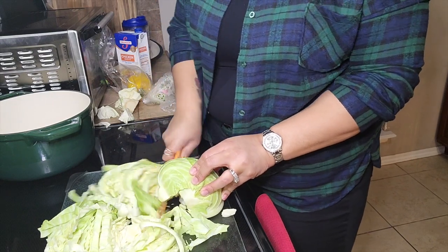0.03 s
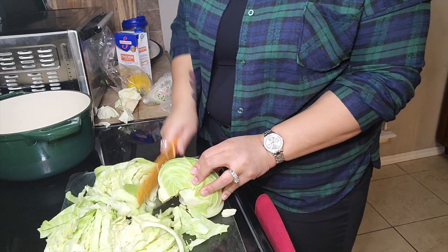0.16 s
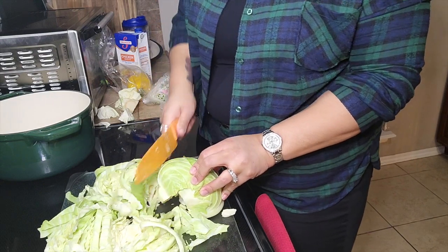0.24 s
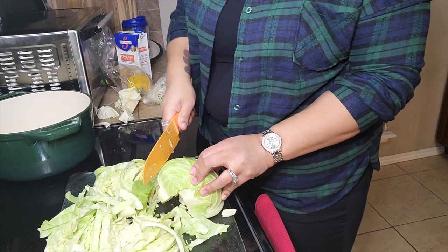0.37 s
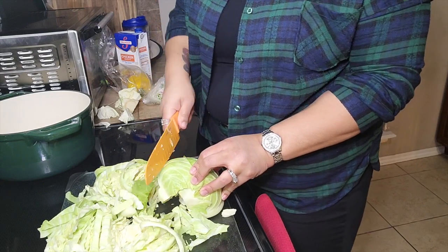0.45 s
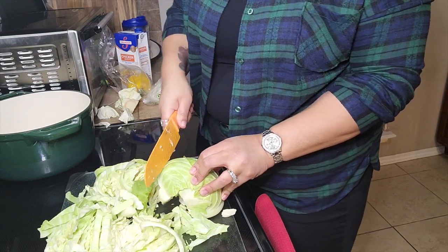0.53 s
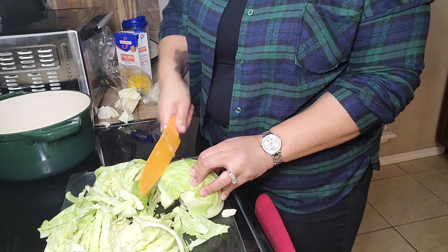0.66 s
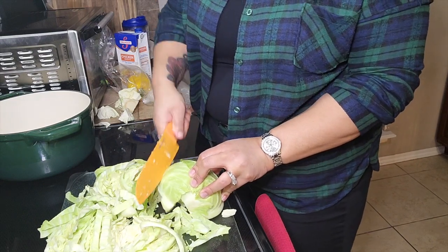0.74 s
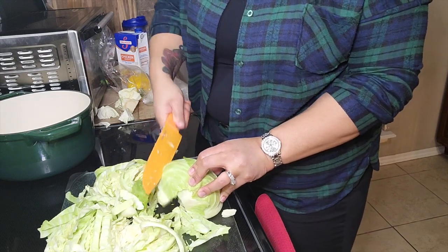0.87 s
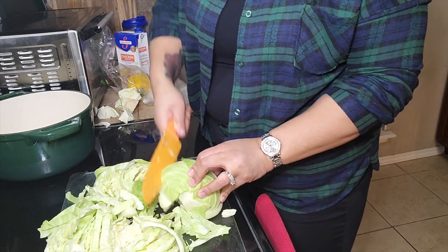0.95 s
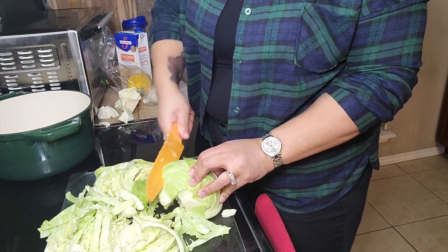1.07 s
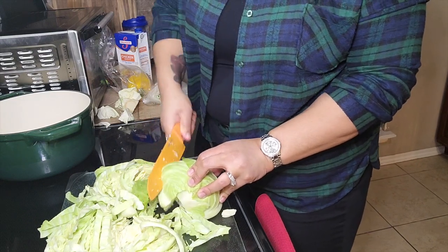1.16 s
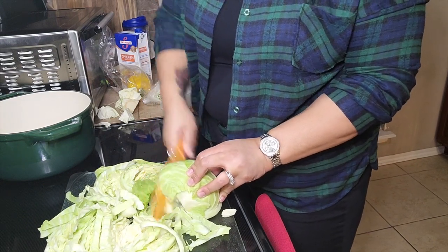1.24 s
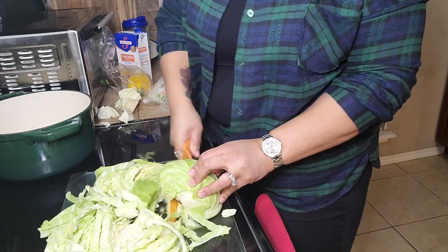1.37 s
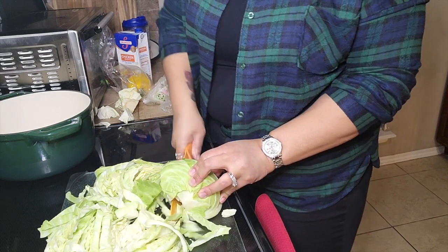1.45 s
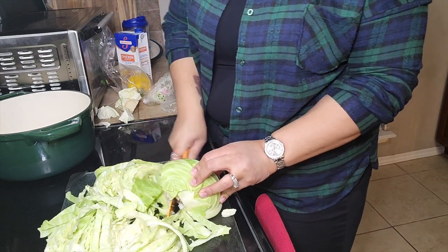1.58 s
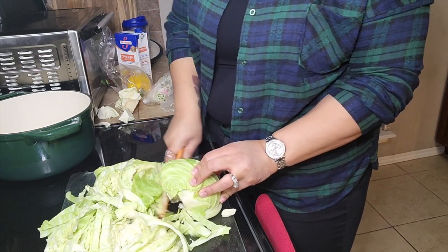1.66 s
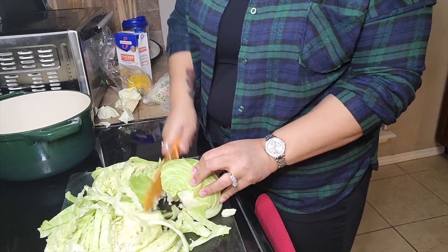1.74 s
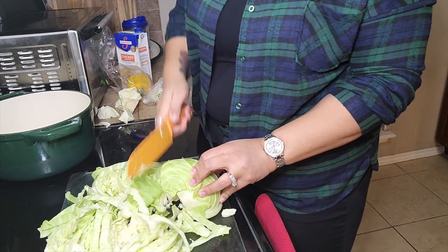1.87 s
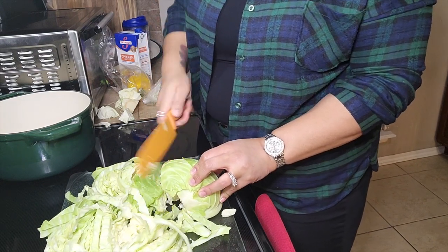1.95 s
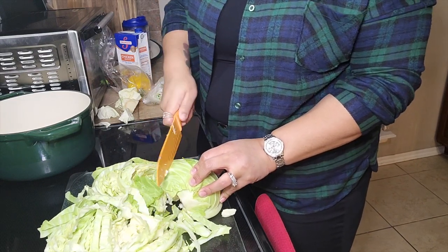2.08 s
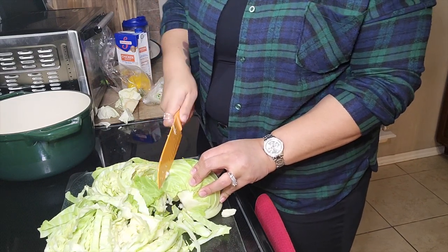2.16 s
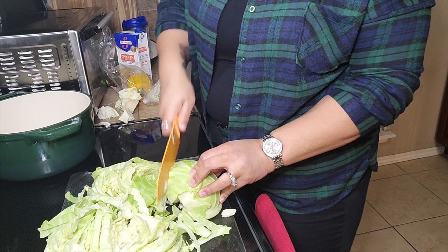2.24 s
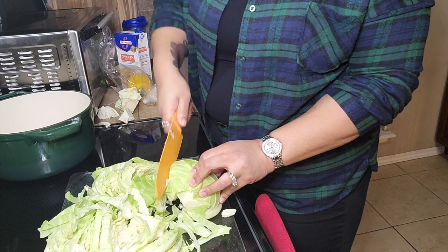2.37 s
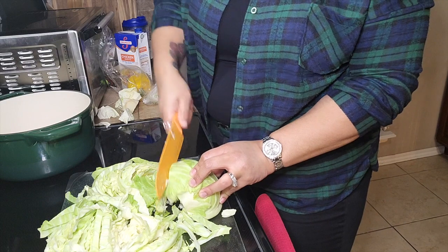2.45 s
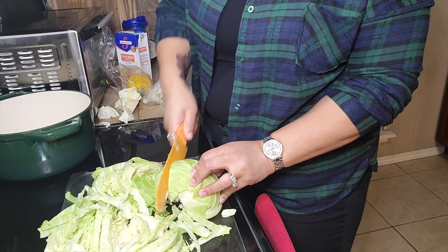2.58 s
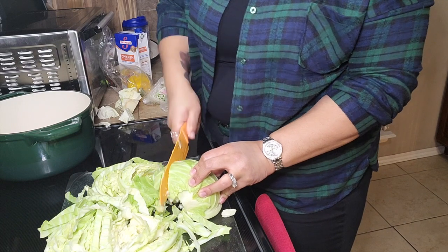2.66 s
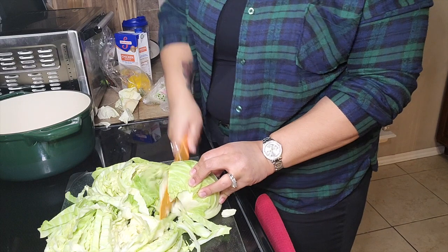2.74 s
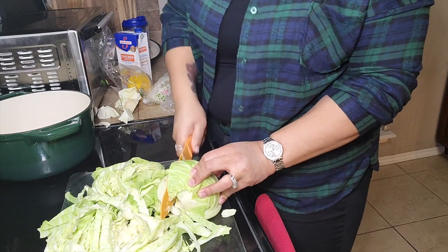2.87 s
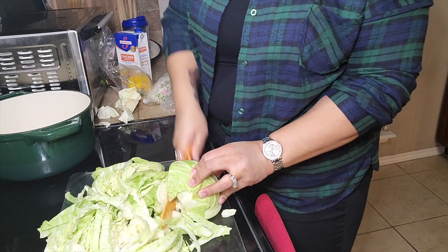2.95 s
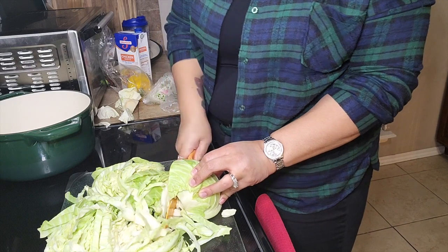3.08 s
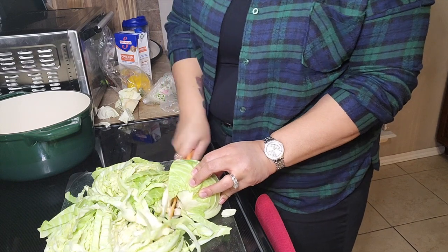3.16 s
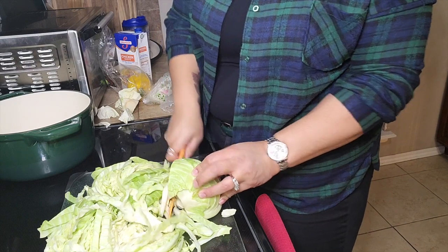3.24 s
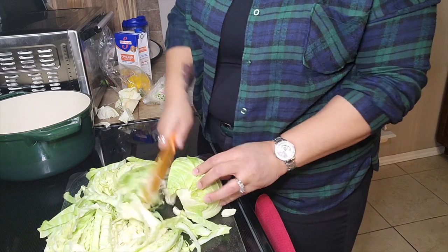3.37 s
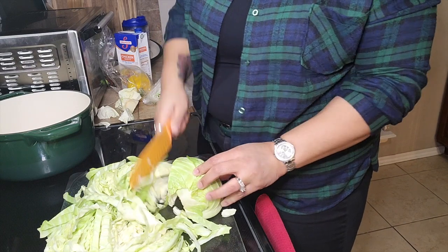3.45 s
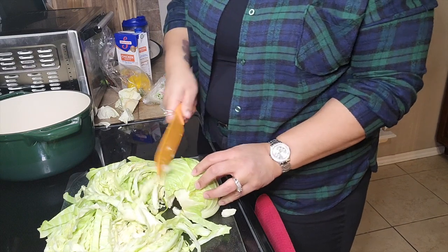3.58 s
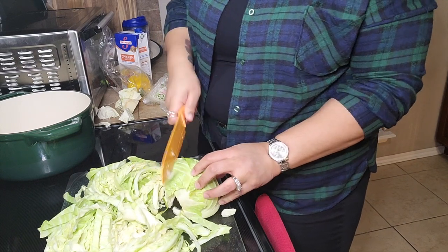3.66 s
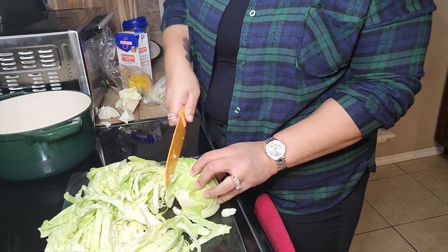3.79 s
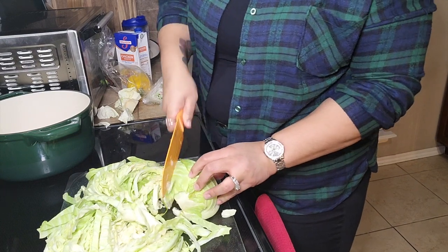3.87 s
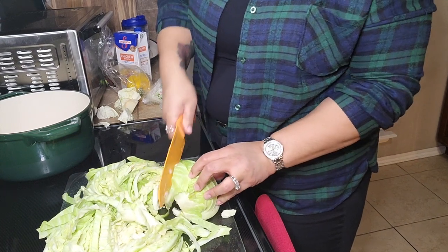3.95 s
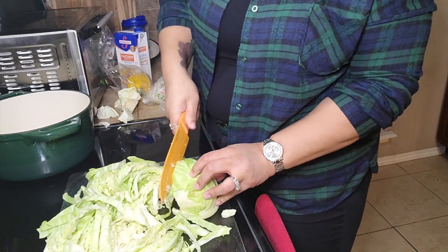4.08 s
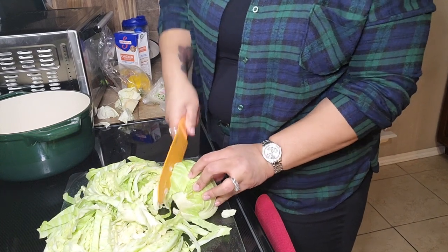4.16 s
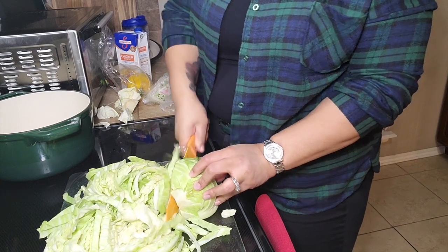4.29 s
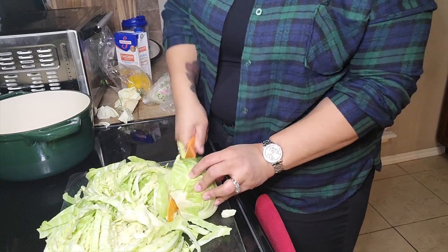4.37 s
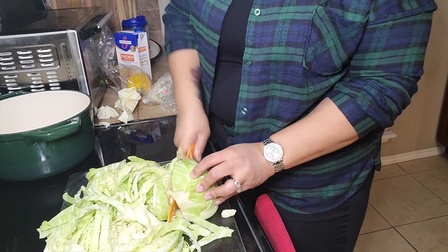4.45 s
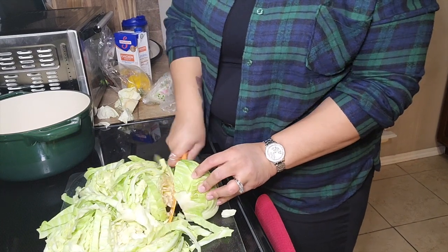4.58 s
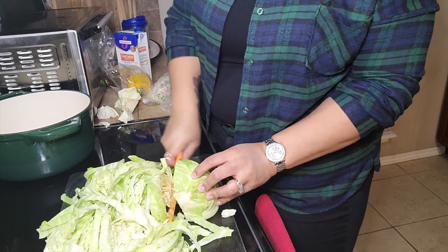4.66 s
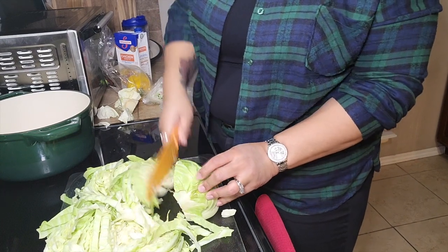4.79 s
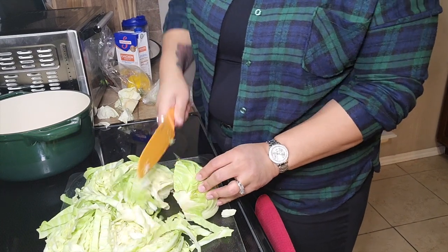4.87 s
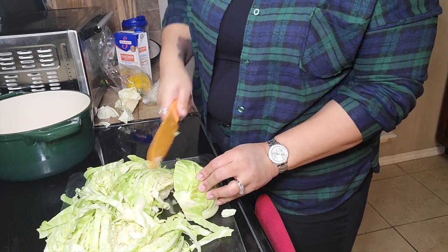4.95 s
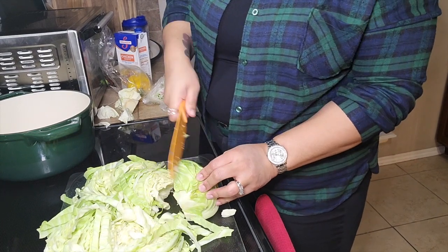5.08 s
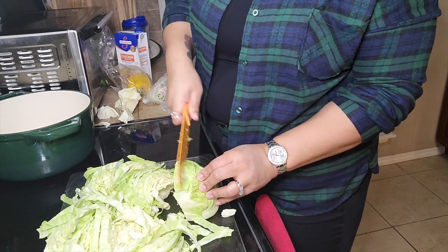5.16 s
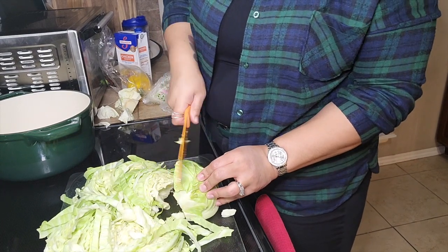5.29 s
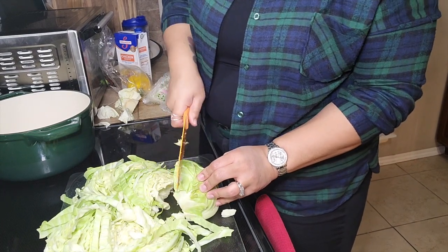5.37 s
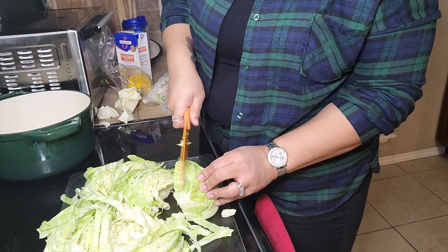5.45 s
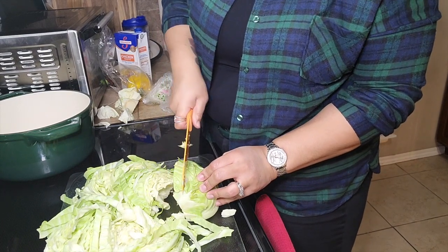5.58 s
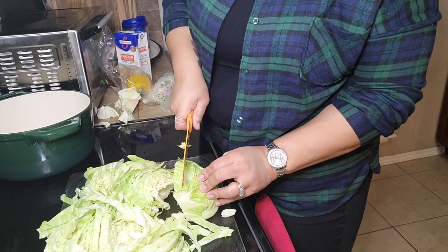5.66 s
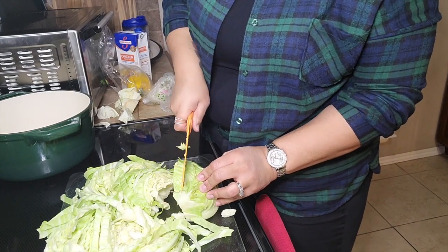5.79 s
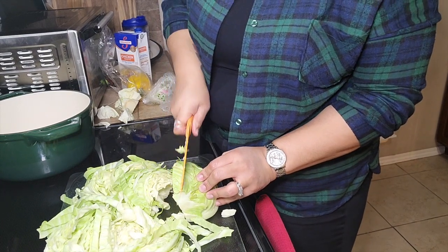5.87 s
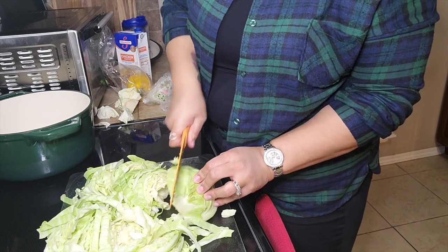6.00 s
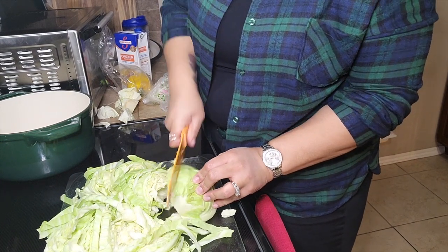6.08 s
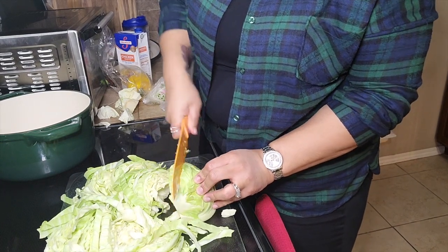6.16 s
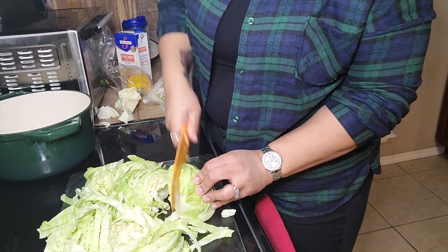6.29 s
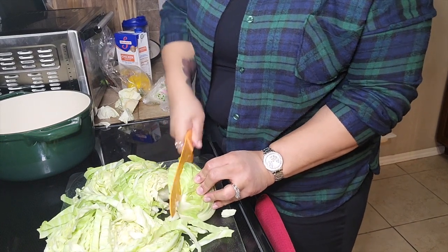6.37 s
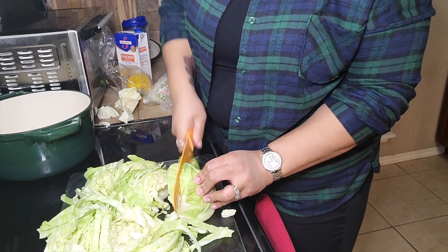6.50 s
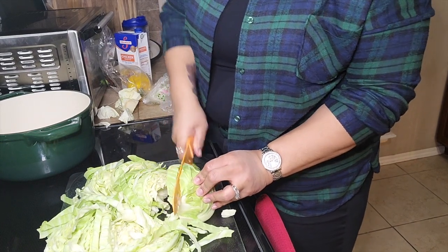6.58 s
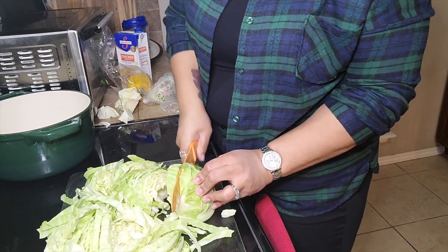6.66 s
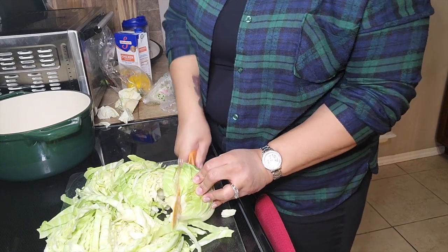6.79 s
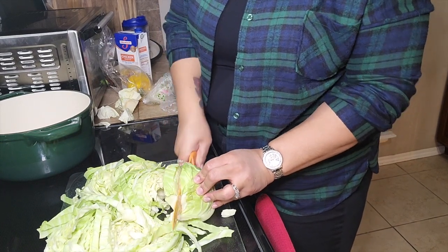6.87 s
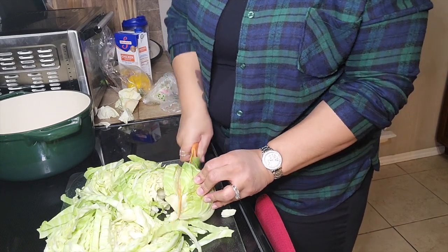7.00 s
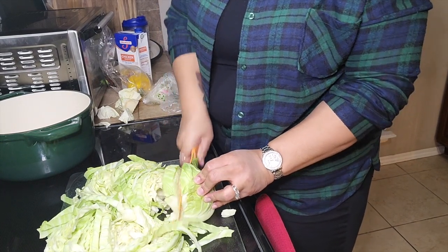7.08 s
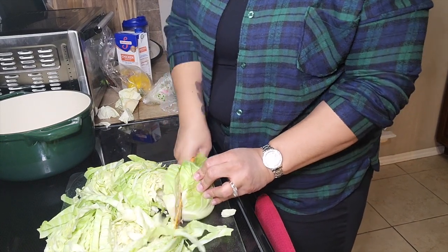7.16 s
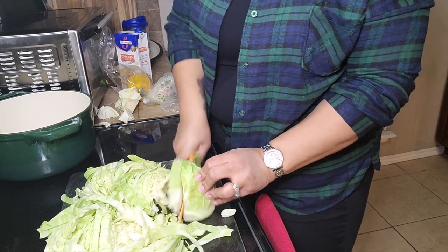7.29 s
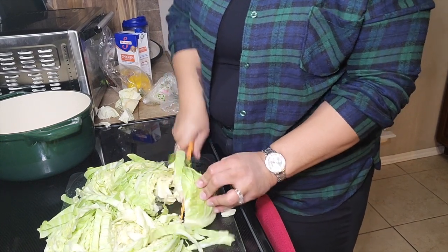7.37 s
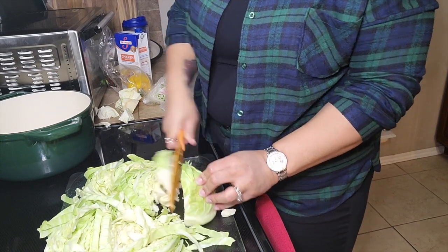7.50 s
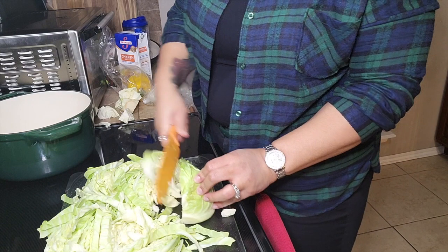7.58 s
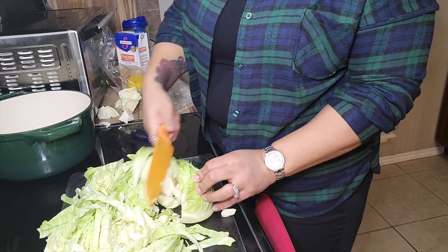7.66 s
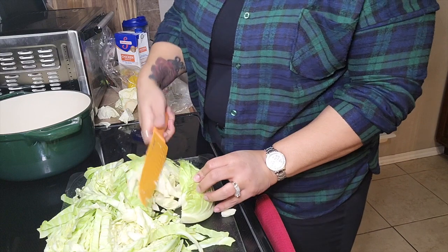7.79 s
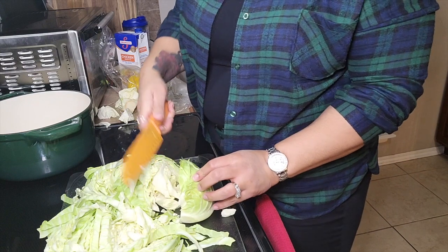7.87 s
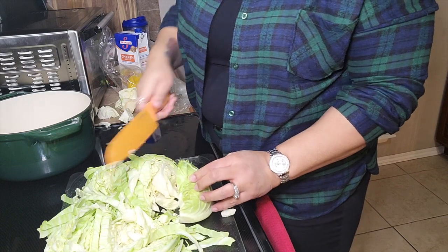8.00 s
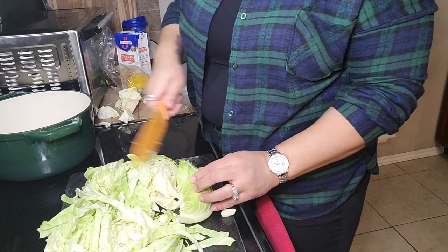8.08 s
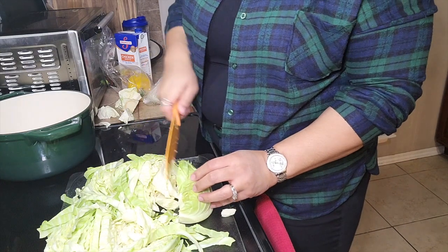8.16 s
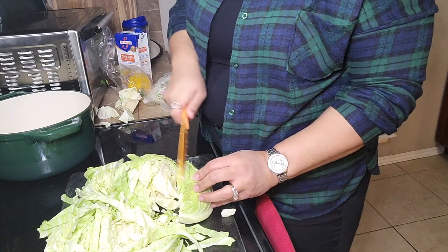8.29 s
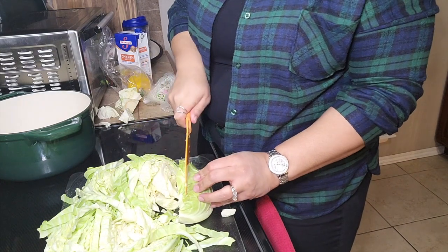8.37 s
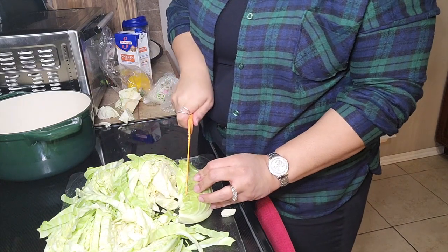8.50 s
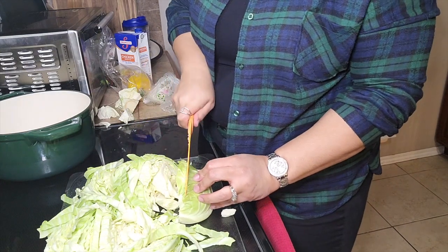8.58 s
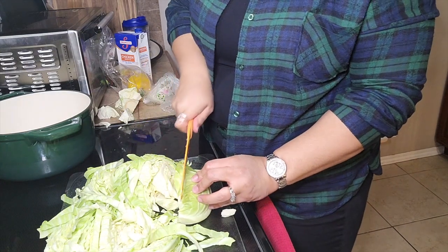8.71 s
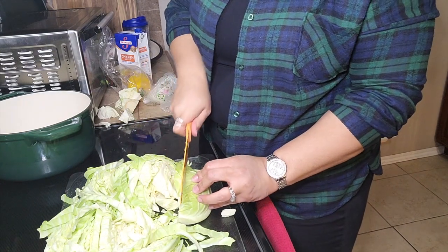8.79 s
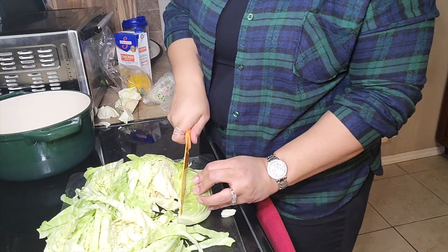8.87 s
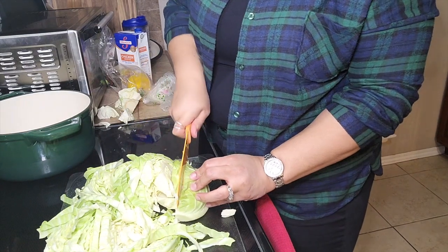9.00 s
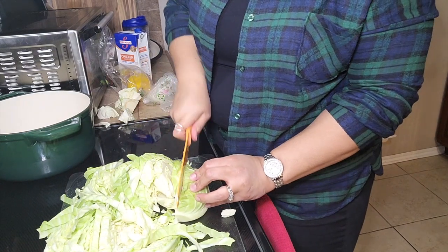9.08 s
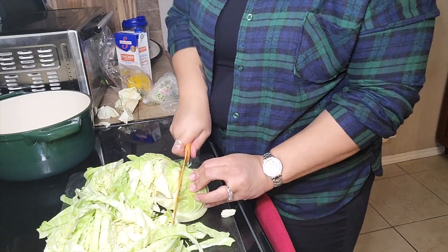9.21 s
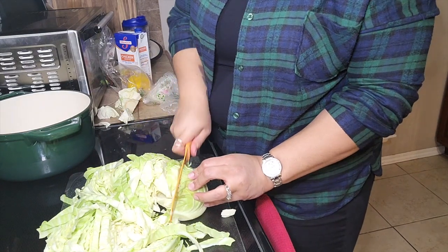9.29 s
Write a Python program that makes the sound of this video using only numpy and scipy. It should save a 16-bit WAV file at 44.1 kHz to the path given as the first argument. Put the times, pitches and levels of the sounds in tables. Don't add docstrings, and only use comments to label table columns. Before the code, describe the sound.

Close stereo camera microphone in a modestly reverberant kitchen. Irregular groups of two to five knife strokes crunch through cabbage, each with gritty leaf tearing, knocking stalks and a soft boomy shudder of the counter. The hardest cracks briefly push down the background hum, which swells back. A quieter stretch past the middle leaves only small leaf ticks and one light cut before heavier chopping resumes and ends with more crunches.

```python
import sys
import numpy as np
from scipy import signal
from scipy.fft import rfft, irfft, next_fast_len
from scipy.io import wavfile
from scipy.ndimage import map_coordinates

SR = 44100
rng = np.random.default_rng(int(sys.argv[2]) if len(sys.argv) > 2 else 0)


def master_out(mix):
    frames = np.transpose(np.atleast_2d(mix))
    ceiling = np.clip(frames, -1, 1)
    pcm = np.round(ceiling * 32767).astype(np.int16)
    wavfile.write(sys.argv[1], SR, pcm)


def decibels_to_gain(level_db):
    exponent = np.asarray(level_db, float) / 20
    return 10 ** exponent


N = 411894

# (frequency [Hz], level [dB rms])
MOTOR_LINES = [(48.3, -48.5), (59.2, -42)]
# (frequency [Hz], level [dB rms])
FRIDGE_OVERTONES = [(118.4, -62), (193.8, -57), (296.1, -62.5), (382.2, -66), (581.4, -70.5)]
# (frequency [Hz], density [dB per Hz])
AIR_SPECTRUM = [(15, -33), (25, -5), (64, -9.5), (153, -20), (200, -16.5), (394, -17), (1100, -33.5),
                (1370, -33), (2410, -47), (11900, -60.5), (16000, -63.5)]
# (frequency [Hz], correlation [1])
AIR_LIKENESS = [(60, 0.87), (240, 0.78), (950, 0.12), (3770, 0.06), (15000, 0.01)]
# (time [s], depth [dB])
GAIN_DUCKS = [
    (0, 10),
    (1.56, 15),
    (3.15, 11.5),
    (7.28, 11),
]
# (frequency [Hz], t60 [s])
ROOM_DECAY = [(200, 1), (1000, 0.98), (4000, 0.76), (12000, 0.94)]
# (frequency [Hz], left lead [rad])
PORT_LEAD = [(0, 0), (1120, -0.1), (1380, -0.8), (1890, 0.4), (2500, -1.0), (2930, 1.2), (3190, -1.8),
             (3450, 0.3), (5000, -0.2), (5250, -0.2), (11000, -0.3), (14900, -10.3), (15800, -6.1),
             (16400, -8.9)]
# (frequency [Hz], left minus right [dB])
PORT_TILT = [(60, -2.5), (150, 1.5), (380, -7.5), (950, -1.5), (2380, 2), (5980, 8), (15000, -6)]
# (frequency [Hz], width [Hz], level [dB])
COUNTER_MODES = [(52.4, 27, -3.5), (83, 24, 1), (145, 32, -5.5), (269, 31, -17)]
# (time [s], peak level [dB], pitch [Hz])
ARM_LEANS = [(0.696, -26.5, 63), (0.818, -32, 46), (0.957, -23.5, 106.4), (1.199, -20.5, 76.6),
             (1.447, -30, 57), (2.259, -24, 85.3), (2.49, -21.5, 71), (2.728, -14.5, 59.7),
             (2.958, -20.5, 53.6), (3.085, -30, 64), (3.16, -33, 54.1), (3.908, -22, 131),
             (4.176, -17.5, 75.4), (4.426, -22.5, 65.4), (5.18, -25, 53.2), (5.45, -37, 53.6),
             (5.974, -20.5, 51.4), (6.127, -31, 133), (6.267, -13, 74.5), (6.547, -19.5, 60.4),
             (6.656, -17.5, 60.4), (7.097, -23, 67), (8.703, -22, 77), (8.829, -21, 80.8), (9.119, -26, 60)]
# (time [s], peak level [dB], pitch [Hz])
EDGE_LANDINGS = [(0.709, -29.5, 61.4), (.99, -26, 73), (1.009, -14.5, 50.6), (1.226, -17.5, 77),
                 (2.26, -16, 71), (2.5, -17.5, 69.4), (2.542, -20, 93), (2.743, -21, 83),
                 (2.976, -24.5, 71), (3.916, -15.5, 92), (3.977, -14.5, 54.3), (4.002, -23.5, 59.6),
                 (4.189, -21, 62.4), (4.233, -14.5, 69), (5.983, -24.5, 56.6), (6.274, -23.5, 74),
                 (6.336, -15, 67), (6.362, -25, 77), (6.767, -16.5, 55), (6.795, -16, 60),
                 (7.161, -16.5, 64.6), (8.845, -30, 59), (9.13, -13, 52), (9.163, -19.5, 55.4),
                 (9.23, -20.5, 81)]
# (time [s], peak level [dB], pitch [Hz], t60 [s])
SINGLE_RINGS = [
    (0, -28, 585, 0.16),
    (0, -28, 237, 0.15),
    (3.21, -51, 2060, 0.71),
    (4.205, -21.5, 253, 0.17),
    (5.287, -46, 7510, 0.069),
    (6.3, -26.5, 421, 0.16),
    (7.135, -18.5, 2500, 0.1),
    (7.37, -36, 2490, 0.23),
]
# (time [s], peak level [dB], pitch [Hz])
STALK_KNOCKS = [(0.624, -25.5, 880), (0.941, -8.5, 830), (0.955, -10, 720), (1.001, -12, 810),
                (1.194, -13.5, 867), (1.216, -10.5, 820), (1.445, -15.5, 1336), (1.499, -13.5, 796),
                (1.509, -4.5, 883), (1.525, -6, 1470), (1.564, -0.5, 880), (1.593, -0.5, 1440),
                (2.253, -14.5, 2490), (2.551, -17, 1150), (2.763, -14.5, 900), (3.083, -6, 1440),
                (3.147, -13, 1950), (3.171, -7.5, 1520), (3.989, -14.5, 809), (4.134, -29, 913),
                (4.207, -10.5, 865), (6.722, -16.5, 855), (6.754, -12, 930), (6.903, -17, 930),
                (7.153, -12, 895), (7.265, -7, 1510), (7.281, -8.5, 1414), (7.333, -11.5, 800),
                (8.64, -38, 900), (9.104, -23.5, 1318)]
# (frequency [Hz], density [dB per Hz])
SNAP_SPECTRUM = [(500, -34.5), (1200, -8.5), (2600, 1), (4000, -4.5), (5400, -3), (6500, -18),
                 (16000, -34.5)]
# (time [s], peak level [dB])
LEAF_TICKS = [(0.3416, -41), (0.4777, -45.5), (1.8284, -35.5), (2.0373, -40), (2.1281, -41.5), (3.458, -45),
              (3.6755, -45), (5.1802, -35), (5.1991, -48), (5.2911, -40.5), (5.6447, -39), (7.7, -38.5),
              (7.9765, -39.5), (8.015, -53), (8.057, -58), (8.1215, -40), (4.566, -39), (4.799, -41),
              (4.872, -39.5), (4.938, -44)]
# (frequency [Hz], density [dB per Hz])
TICK_SPECTRUM = [(1200, -33.5), (2500, -7), (4300, -0.5), (5300, -1.5), (7000, -7), (16000, -9)]
# (time [s], peak level [dB])
FIBRE_CLICKS = [(0.6878, -23), (0.8006, -28.5), (0.9398, -26.5), (0.9554, -22.5), (0.9814, -19.5),
                (1.0727, -22.5), (1.109, -24.5), (1.4242, -21.5), (1.4432, -19), (1.4985, -20.5),
                (1.5657, -13.5), (1.5748, -10.5), (1.5814, -11), (2.1649, -39.5), (2.2041, -23.5),
                (2.2528, -20.5), (2.2633, -12.5), (2.6259, -23), (2.7018, -26.5), (2.9295, -26),
                (3.0712, -24), (3.0774, -15.5), (3.0844, -7), (3.1472, -14), (3.1741, -8), (3.91, -16.5),
                (4.0937, -32), (4.1833, -16.5), (4.387, -38), (4.4169, -31.5), (5.45, -28.5), (5.4657, -26),
                (5.9753, -16.5), (6.0521, -27), (6.1665, -25.5), (6.4812, -21), (6.6842, -28), (6.7264, -9),
                (6.9681, -32), (7.2804, -10.5), (8.6403, -31), (8.6544, -29)]
# (frequency [Hz], density [dB per Hz])
FIBRE_SPECTRUM = [(700, -28.5), (2000, -9), (3500, 1), (5200, 5.5), (6500, -15), (10000, -16.5),
                  (16000, -22)]
# (time [s], peak level [dB])
THIN_SNAPS = [(.6854, -22), (.82, -17.5), (1.0669, -16.5), (1.4007, -15.5), (2.2149, -20.5), (2.467, -19),
              (2.6359, -35.5), (3.0855, 3), (3.9029, -8.5), (3.9499, -7), (4.134, -12.5), (5.4569, -29.5),
              (5.8648, -26.5), (5.9527, -11), (6.096, -20.5), (6.126, -11), (6.5795, -7), (7.279, -10),
              (8.6409, -22), (8.7094, -25.5), (8.8044, -17.5)]
# (time [s], peak level [dB])
MID_SNAPS = [(0.594, -26.5), (0.6209, -22), (0.926, -25.5), (.939, -24.5), (1.1894, -20.5), (1.5673, -16.5),
             (2.2534, -16), (2.49, -16), (2.71, -21), (3.148, -12), (3.1712, -14), (4.0392, -23),
             (4.1714, -11), (4.3359, -16.5), (4.4787, -25), (5.978, -14.5), (6.2691, -16.5), (6.536, -13),
             (6.7222, -6.5), (7.2629, -16.5), (8.685, -18), (8.7317, -19), (9.1049, -12.5), (9.1252, -5.5)]
# (time [s], peak level [dB])
THICK_SNAPS = [
    (1.4426, -16),
    (1.4955, -17),
    (1.5259, -25),
    (2.723, -31),
    (3.9869, -25.5),
    (6.392, -30.5),
    (6.9004, -29),
    (6.95, -31),
    (7.043, -18),
    (7.1, -16.5),
]
# (time [s], fizz level [dB], crunch level [dB], rise [s], fall [s])
LEAF_STROKES = [(.7, -38.5, -29.5, 0.045, 0.047), (.83, -39, -33.5, 0.072, 0.057),
                (.95, -30.5, -27, 0.031, 0.11), (1.078, -40.5, -35.5, 0.034, 0.092),
                (1.2, -31.5, -24.5, 0.036, .17), (2.266, -33, -29, 0.079, 0.061),
                (2.497, -33.5, -26, 0.035, .12), (2.642, -40, -30, 0.042, 0.04),
                (2.732, -33, -25, 0.047, 0.11), (2.956, -35.5, -25, 0.05, 0.074),
                (3.914, -36.5, -31, 0.085, 0.12), (3.972, -37, -30, 0.1, 0.032),
                (4.192, -31.5, -21, 0.058, 0.14), (4.476, -45, -33.5, 0.28, 0.16),
                (5.464, -42.5, -47, 0.034, 0.076), (5.98, -36.5, -33.5, 0.094, 0.099),
                (6.29, -34, -26.5, 0.036, 0.15), (6.582, -37.5, -25.5, 0.12, 0.061),
                (6.735, -44, -39.5, 0.092, 0.16), (6.803, -33, -23, 0.21, 0.055),
                (7.115, -31, -25, 0.056, 0.12), (8.822, -37, -31, 0.091, 0.095),
                (9.121, -43, -29, 0.035, 0.1), (9.159, -40, -26.5, 0.069, 0.18)]
# (time [s], fizz level [dB], crunch level [dB], rise [s], fall [s])
CORE_CRUNCHES = [(.005, -42, -8.5, 0.1, 0.075), (1.445, -45, -12, 0.011, 0.02),
                 (1.502, -43.5, -19.5, 0.013, 0.055), (1.528, -40.5, -9.5, 0.063, .025),
                 (1.571, -39.5, -8.5, 0.012, 0.063), (1.598, -39, -10, .05, 0.079),
                 (1.635, -49, -16.5, 0.048, 0.031), (3.074, -34, -25, .012, 0.012),
                 (3.088, -39.5, -7, 0.027, 0.017), (3.115, -49, -20.5, .03, 0.08),
                 (3.152, -44, -16, 0.013, 0.083), (3.177, -39, -14, 0.03, 0.03),
                 (3.21, -49, -34.5, 0.037, 0.064), (7.266, -45.5, -15, 0.026, .05),
                 (7.283, -41.5, -13.5, .012, 0.16)]
# (time [s], fizz level [dB], crunch level [dB], rise [s], fall [s])
LEAF_BRUSHES = [(.61, -54.5, -45, .025, 0.58), (1.38, -44, -31.5, .2, 0.4), (2.38, -55, -51, 0.23, 0.12),
                (2.862, -50.5, -36, 0.08, 0.39), (3.26, -60.5, -56, 0.13, 0.31),
                (3.492, -52.5, -51, 0.11, 0.075), (3.692, -69, -65, 0.027, 0.3),
                (4.06, -44.5, -40, .07, 0.11), (4.33, -52.5, -44.5, .1, 0.4), (4.715, -56, -45, .04, .1),
                (4.768, -47, -42, .03, 0.073), (5.182, -55.5, -56, .015, 0.051),
                (5.288, -58.5, -72, 0.0184, 0.036), (5.43, -64, -75, .1, .1),
                (5.648, -61.5, -59.5, 0.011, 0.034), (5.87, -67, -69, 0.23, 0.4),
                (6.124, -43.5, -40.5, 0.054, 0.41), (6.46, -51, -40, 0.24, 0.16),
                (6.92, -55.5, -34, 0.058, 0.24), (7.054, -46, -31.5, 0.22, 0.07),
                (7.46, -61, -52, .2, 0.65), (7.86, -78.5, -61, .1, .06), (8.645, -51.5, -50, .012, 0.27),
                (8.74, -43, -41.5, 0.11, 0.12), (8.982, -56.5, -43.5, .1, 0.38)]
# (time [s], level change [dB])
PASSING_LAYERS = [(.001, 6), (.012, 0), (.704, -0.5), (0.941, 4), (.958, 2), (.994, 5.5), (1.004, 4.5),
                  (1.08, 6), (1.196, 2), (1.219, -1), (1.237, 3.5), (1.261, 4), (1.511, -0.5), (1.532, -3),
                  (1.568, -5), (1.582, 5), (1.597, 2.5), (1.62, 1), (1.644, 0.5), (2.271, 3.5), (2.527, 7.5),
                  (2.554, 7.5), (2.726, 2.5), (2.764, 6), (2.795, 6.5), (2.959, -1), (2.979, 0.5),
                  (3.102, 0.5), (3.16, 6), (3.177, 5), (3.212, 7), (3.97, 0.5), (3.991, 12.5), (4.195, -2),
                  (4.211, -1), (4.484, 12), (5.981, -7), (6.134, 11), (6.311, 0), (6.327, 2.5), (6.394, -1),
                  (6.581, -6), (6.599, 0), (6.727, 1.5), (6.756, 4.5), (6.798, 1), (6.829, 6), (7.108, 0),
                  (7.157, 6.5), (7.267, 0), (7.284, 3.5), (7.31, 5.5), (7.337, -0.5), (8.824, 2),
                  (9.126, -2.5), (9.173, 7.5), (9.213, 5)]
# (time [s], swell [dB])
FIZZ_SWELLS = [(.805, -7), (.951, -10), (1.115, 6), (1.388, 2), (1.433, 6), (1.543, -11), (2.243, -6),
               (2.734, -3.5), (3.886, -4), (4.162, 6), (4.205, -5.5), (4.511, -7), (6.353, 3), (6.383, -9),
               (6.484, 7.5), (6.602, 7), (6.712, -10.5), (6.816, -5.5), (7.196, -6), (9.119, 7.5),
               (9.172, 3)]
# (time [s], swell [dB])
CRUNCH_SWELLS = [(.035, -4), (.634, 6), (.858, -7.5), (1.126, 7), (1.287, 4.5), (1.42, 10), (2.476, 5.5),
                 (3.05, 8.5), (3.079, -4.5), (3.942, -6.5), (4.743, 8.5), (6.014, 6.5), (6.372, -7),
                 (6.778, 4), (6.952, 6.5), (7.067, -7.5), (7.25, -4), (9.268, -7.5)]
# (frequency [Hz], density [dB per Hz])
FIZZ_SPECTRUM = [(500, -41), (1500, -22.5), (3000, -1.5), (4400, -4), (5600, -0.5), (6500, -12), (8500, -7),
                 (12000, -11.5), (16000, -20.5)]
# (frequency [Hz], width [Hz], level [dB])
LEAF_MODES = [(2670, 670, 0.5), (3400, 140, 7), (4620, 370, 7.5), (5650, 170, 7), (8400, 60, -4.5),
              (7260, 120, 11.5), (9900, 170, -23), (13200, 110, -3), (14600, 590, -2.5)]
# (frequency [Hz], density [dB per Hz])
SLICE_SPECTRUM = [(250, -15), (450, -16), (700, -2), (900, -5), (1400, -3), (2200, -8.5), (4500, -22),
                  (7000, -24.5), (10000, -45.5)]
# (frequency [Hz], density [dB per Hz])
CORE_SPECTRUM = [(150, -22), (250, -12.5), (540, -8.5), (870, -17.5), (1500, -3.5), (2100, -7.5),
                 (2700, -11), (3700, -8.5), (5300, -22.5), (6500, -36), (16000, -58)]
# (frequency [Hz], density [dB per Hz])
CRACK_SPECTRUM = [(500, -47.5), (1200, -10), (2200, -3), (3800, 3.5), (5400, -3), (6500, -12.5),
                  (16000, -49)]
# (frequency [Hz], width [Hz], level [dB])
HEAD_MODES = [(429, 24, 2), (860, 110, 1), (1389, 150, -13), (2500, 42, -8), (3310, 52, -13)]
# (frequency [Hz], width [Hz], level [dB])
BOARD_MODES = [(605, 48, -1), (867, 46, 0.5), (980, 46, -4.5), (1440, 40, -0.5), (1780, 130, -8),
               (2210, 69, -7.5), (2490, 35, -3), (3100, 25, -15), (3220, 25, -5), (3650, 65, -12.5),
               (3820, 60, -11), (4550, 150, -10.5), (5370, 130, -10.5), (5750, 31, -18)]
# (frequency [Hz], width [Hz], level [dB])
BOARD_AFTERRING = [(1290, 9, 7), (1430, 12, 5), (2090, 10, 4)]


def unit(x):
    return x / np.sqrt(np.mean(x ** 2) + 1e-20)


def along(points, hz):
    f, v = np.transpose(points)
    return np.interp(np.log(hz + 1), np.log(f + 1), v)


def curves(rows):
    s, *cols = np.transpose(rows)
    return [np.interp(np.arange(N) / SR, s, c) for c in cols]


def wobble(rate):
    return map_coordinates(rng.standard_normal(int(N * rate / SR) + 4), [np.arange(N) * rate / SR])


def filtered(x, response):
    m = next_fast_len(N + SR // 2)
    return irfft(rfft(x, m) * response(np.fft.rfftfreq(m, 1 / SR)), m)[..., :N]


def causal(points):
    def response(hz):
        cepstrum = irfft(np.log(decibels_to_gain(along(points, hz)) + 1e-6))
        half = len(cepstrum) // 2
        cepstrum[1:half] *= 2
        cepstrum[half + 1:] = 0
        return np.exp(rfft(cepstrum))
    return response


def modes(table):
    def response(f):
        total = 0
        for k, (centre, width, db) in enumerate(table):
            damping = 1j * f * width
            total = total + (-1) ** k * decibels_to_gain(db) * damping / (centre * centre - f * f + damping)
        return total
    return response


def resonant(drive, table, plain, shift_db, rate):
    top_db = max(db for _, _, db in table)
    total = plain * drive
    for k, mode in enumerate(table):
        strike = decibels_to_gain(shift_db * np.tanh(wobble(rate)) - top_db)
        total = total + (-1) ** k * filtered(drive * strike, modes([mode]))
    return total


def spatter(events, t60):
    x, t = np.zeros(N + SR), np.arange(SR // 10) / SR
    shape = decibels_to_gain(-60 * t / t60) * (1 - np.exp(-t / 0.00029))
    for (s, db), noise in zip(events, rng.standard_normal((len(events), len(t)))):
        x[round(s * SR):][:len(t)] += decibels_to_gain(db) * shape * noise
    return x[:N]


def fridge():
    t = np.arange(N) / SR
    hum = 0
    for hz, db in MOTOR_LINES:
        hum = hum + decibels_to_gain(db + 2.0 + 0.66 * wobble(9.3)) * np.sin(2 * np.pi * (hz * t + rng.random()))
    for hz, db in FRIDGE_OVERTONES:
        hum = hum + decibels_to_gain(db + 4 + 3.4 * wobble(14)) * np.sin(2 * np.pi * (hz * t + 0.15 * wobble(7)))

    def mid_side(hz):
        turn = np.arccos(np.clip(along(AIR_LIKENESS, hz), -1, 1)) / 2
        return decibels_to_gain(along(AIR_SPECTRUM, hz)) * [np.cos(turn), np.sin(turn)]
    mid, side = filtered(rng.standard_normal((2, N)), mid_side)
    air_db, sway_db = -47.5, 1
    return hum + decibels_to_gain(air_db + sway_db * wobble(2.1)) * unit(np.array([mid + side, mid - side]))


def gain_db():
    rest_db, duck_s, recover_s = 3, 0.098, 0.36
    t = np.arange(N) / SR
    gain = np.full(N, float(rest_db))
    for s, db in GAIN_DUCKS:
        since = np.clip(t - s, 0, None)
        gain -= db * (1 - np.exp(-since / duck_s)) * np.exp(-since / recover_s)
    return gain


def kitchen(x, t60_share, delay_s, piece=SR // 4):
    wet = np.zeros((2, N + 2 * SR))
    for start in range(0, N, piece):
        hz, t, z = signal.stft(rng.standard_normal((2, SR * 3 // 4)), SR, nperseg=256)
        decay = decibels_to_gain(-60 * t / (t60_share * along(ROOM_DECAY, hz))[:, None])
        tail = signal.istft(z * decay, SR, nperseg=256)[1]
        part = signal.fftconvolve(x[None, start:start + piece], tail / np.linalg.norm(tail[0]), axes=1)
        wet[:, start + int(delay_s * SR):][:, :part.shape[1]] += part
    return wet[:, :N]


def ports(x):
    side = np.array([[.5], [-.5]])

    def response(hz):
        return decibels_to_gain(side * along(PORT_TILT, hz)) * np.exp(1j * side * along(PORT_LEAD, hz))
    return filtered(x[None], response)


def counter():
    shudder_cycles, shudder_hz, grows = 4.77, 61, 1
    lean_db, thud_share = -1.5, 0.47
    shudder, load, t = np.zeros(N + SR), np.zeros(N + SR), np.arange(SR // 3) / SR
    pushes = [(s, db + lean_db, hz, 1) for s, db, hz in ARM_LEANS]
    pushes += [(*row, thud_share) for row in EDGE_LANDINGS]
    for (s, db, hz, share), noise in zip(pushes, rng.standard_normal((len(pushes), len(t)))):
        u = t * hz / (share * shudder_cycles * (hz / shudder_hz) ** grows)
        shape = decibels_to_gain(db) * 3 * u * np.exp(-3 * u ** 0.86)
        shudder[round(s * SR):][:len(t)] += shape * np.sin(2 * np.pi * hz * t)
        load[round(s * SR):][:len(t)] += shape * noise
    return decibels_to_gain(5.5) * shudder[:N] + decibels_to_gain(27) * filtered(load[:N], modes(COUNTER_MODES))


def rings():
    x, t = np.zeros(N + SR), np.arange(SR // 5) / SR
    onset = 1 - np.exp(-t / 0.0059)
    fade = np.clip((t[-1] - t) / .02, 0, 1)
    for s, db, hz, t60 in SINGLE_RINGS:
        tone = np.sin(2 * np.pi * hz * t)
        x[round(s * SR):][:len(t)] += decibels_to_gain(db - 60 * t / t60) * onset * fade * tone
    return x[:N] * decibels_to_gain(4.7 * wobble(60))


def knocks():
    tone_t60, tone_db = 0.03, -4.5
    snap_t60, snap_db = 0.0072, -3.5
    x, t = np.zeros(N + SR), np.arange(SR // 10) / SR
    shape = decibels_to_gain(tone_db - 60 * t / tone_t60) * (1 - np.exp(-t / 0.00091))
    for s, db, hz in STALK_KNOCKS:
        x[round(s * SR):][:len(t)] += decibels_to_gain(db) * shape * np.sin(2 * np.pi * hz * t)
    snaps = spatter([row[:2] for row in STALK_KNOCKS], t60=snap_t60)
    return x[:N] + decibels_to_gain(snap_db) * filtered(snaps, causal(SNAP_SPECTRUM))


def pressure():
    depth_db = 25
    strokes = ((LEAF_STROKES, (1.09, 1.53, 1.7)), (CORE_CRUNCHES, (1, 1.5, 1.7)),
               (LEAF_BRUSHES, (1.15, 1.2, 0.85)))
    t = np.arange(0, N / SR + .01, .001)[:, None]
    power = np.full((2, len(t)), 1e-11)
    for rows, (longer, fizz_bend, bend) in strokes:
        s, fizz_db, crunch_db, rise, fall = np.transpose(rows)
        before = np.clip(s - t, 0, None) / np.abs(rise)
        after = np.clip(t - s, 0, None) / np.abs(fall)
        fizz_loss = depth_db * (before + after ** fizz_bend)
        crunch_loss = depth_db * (before / longer + (after / longer) ** bend)
        power[0] += np.sum(decibels_to_gain(fizz_db - fizz_loss) ** 2, axis=1)
        power[1] += np.sum(decibels_to_gain(crunch_db - crunch_loss) ** 2, axis=1)
    return curves(np.column_stack([t, *10 * np.log10(power)]))


def swells_db(layers, half_s):
    t = np.arange(0, N / SR + .01, .001)[:, None]
    s, db = np.transpose(layers)
    return curves(np.column_stack([t, np.sum(db * np.exp(-((t - s) / half_s) ** 2), axis=1)]))[0]


def crowd(level_db):
    sparse_below_db, slope, sparsest_db = -38, .4, -14
    return decibels_to_gain(slope * np.clip(level_db - sparse_below_db, sparsest_db, 0))


def bursts(share, spread_db, clump_db):
    when, size, sign = rng.random(N), rng.exponential(size=N), rng.standard_normal(N)
    clicks = (when < share) / np.sqrt(share) * sign * decibels_to_gain(spread_db * np.minimum(size, 4.5))
    return clicks * decibels_to_gain(clump_db * (0.22 * wobble(70) + 0.9 * wobble(330)))


def leaf_fizz(fizz_db, crunch_db, crisp, core):
    level_db = fizz_db + swells_db(FIZZ_SWELLS, .008) + 8.5
    cells = unit(bursts(share=0.11 * crowd(fizz_db), spread_db=2.0, clump_db=3.0))
    thin = decibels_to_gain(level_db) * cells + decibels_to_gain(-3.0) * crisp * (1 - core)
    fizz = resonant(filtered(thin, causal(FIZZ_SPECTRUM)), LEAF_MODES, plain=0.98, shift_db=5.5, rate=28)
    skim = 1 / (1 + np.exp(-(fizz_db - crunch_db - 5) / 2))
    edge_colour = causal([(2000, -22.0), (5000, 2.0), (13000, 4.0), (16000, -8.5)])
    fizz = fizz + filtered(decibels_to_gain(-6.5) * skim * thin, edge_colour)
    fizz = fizz + decibels_to_gain(4.0) * filtered(spatter(LEAF_TICKS, t60=0.0045), causal(TICK_SPECTRUM))
    return fizz + filtered(spatter(FIBRE_CLICKS, t60=0.0082), causal(FIBRE_SPECTRUM))


def head_and_board(crunch_db, crisp, core):
    dull = 0
    for ribs, dull_db in ((THIN_SNAPS, -11.5), (MID_SNAPS, -6.5), (THICK_SNAPS, 4)):
        dull = dull + decibels_to_gain(dull_db) * spatter(ribs, t60=0.021)
    level_db = crunch_db + swells_db(PASSING_LAYERS, 0.0059) + swells_db(CRUNCH_SWELLS, .008) + 10.0
    cells = unit(bursts(share=.06 * crowd(crunch_db - 5.5), spread_db=0.7, clump_db=1.2 * (0.5 - 1.2 * core)))
    thick = decibels_to_gain(level_db) * cells + decibels_to_gain(9.0) * dull
    hard = filtered(thick * core, causal(CORE_SPECTRUM))
    hard = hard + decibels_to_gain(8.5) * filtered(crisp * core, causal(CRACK_SPECTRUM))
    soft = decibels_to_gain(5.0) * filtered(thick * (1 - core), causal(SLICE_SPECTRUM))
    board = decibels_to_gain(7.5) * resonant(hard * core, BOARD_MODES, plain=.22, shift_db=5, rate=50)
    board = board + filtered(hard * core, modes(BOARD_AFTERRING))
    head = decibels_to_gain(5.5) * resonant(soft + hard * (1 - core), HEAD_MODES, plain=0.25, shift_db=4.5, rate=31)
    return board + head


def blade():
    fizz_db, crunch_db = pressure()
    core = 1 / (1.5 + np.exp(-(crunch_db - fizz_db - 15) / 3))
    crisp = spatter(THIN_SNAPS + MID_SNAPS + THICK_SNAPS, t60=0.014)
    fizz = leaf_fizz(fizz_db, crunch_db, crisp, core)
    return fizz, knocks() + rings() + head_and_board(crunch_db, crisp, core)


def spread(fizz):
    spread_db, spread_hz = -1, 3200
    flicker = filtered(fizz * unit(wobble(530)), lambda hz: hz ** 2 / (hz ** 2 + spread_hz ** 2))
    return decibels_to_gain(spread_db) * flicker * np.array([[1], [-1]])


def scene():
    fizz, crunch = blade()
    upper = filtered(crunch, lambda hz: hz ** 2 / (hz ** 2 + 700 ** 2))
    near = kitchen(decibels_to_gain(2) * upper + decibels_to_gain(3) * fizz, t60_share=.055, delay_s=.0004, piece=SR // 8)
    far = decibels_to_gain(-10) * kitchen(fizz + crunch, t60_share=0.67, delay_s=.008)
    direct = ports(fizz + crunch + counter()) + spread(fizz)
    return direct + near + far + decibels_to_gain(gain_db()) * fridge()


def roll_off(x):
    return signal.sosfilt(signal.butter(12, 16810, fs=SR, output="sos"), x)


def record(dry):
    soft = dry / (1 + np.abs(dry / .95) ** 6) ** (1 / 6)
    limited = filtered(soft, lambda hz: (hz < 16050) * hz ** 4 / (hz ** 4 + 37 ** 4))
    return roll_off(limited)


dry = scene()
out = record(dry)
master_out(out)
```